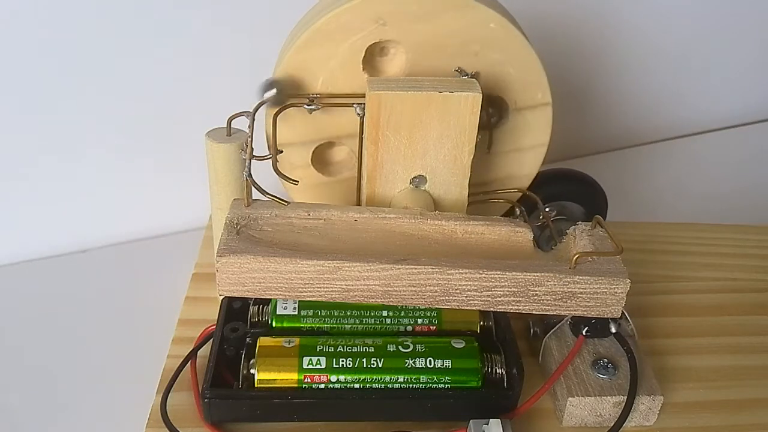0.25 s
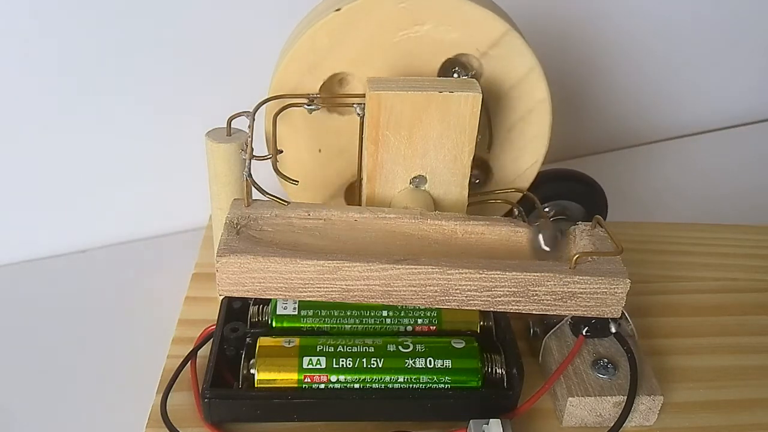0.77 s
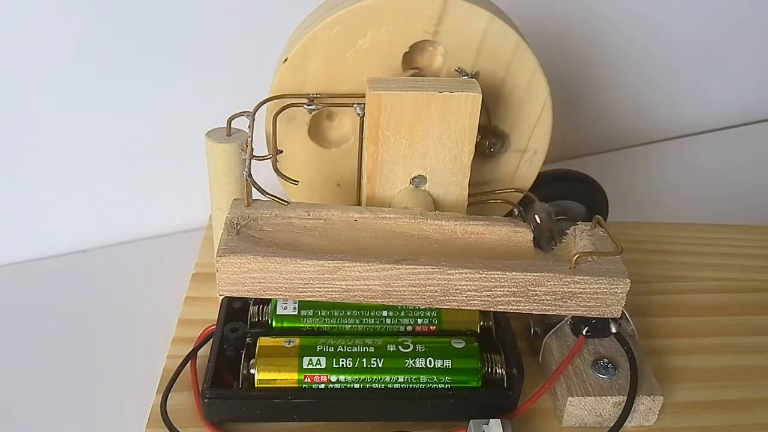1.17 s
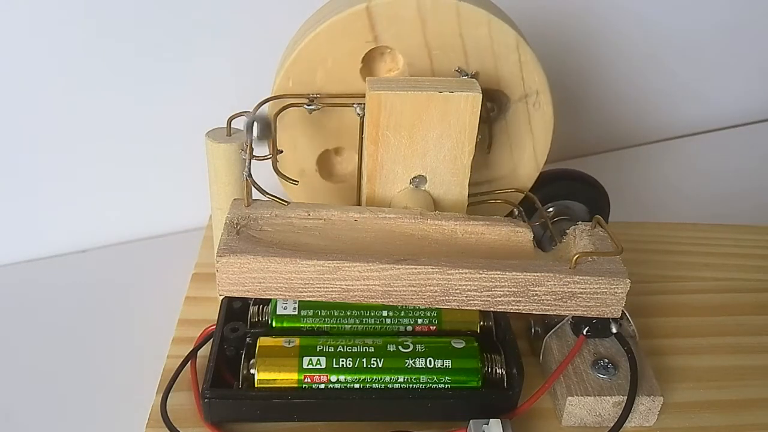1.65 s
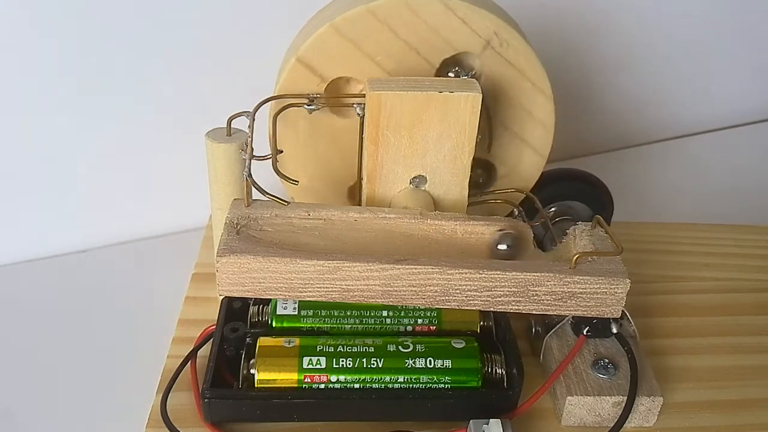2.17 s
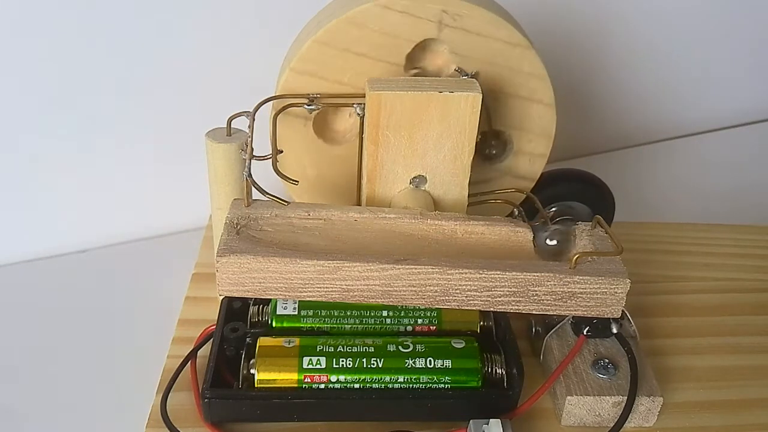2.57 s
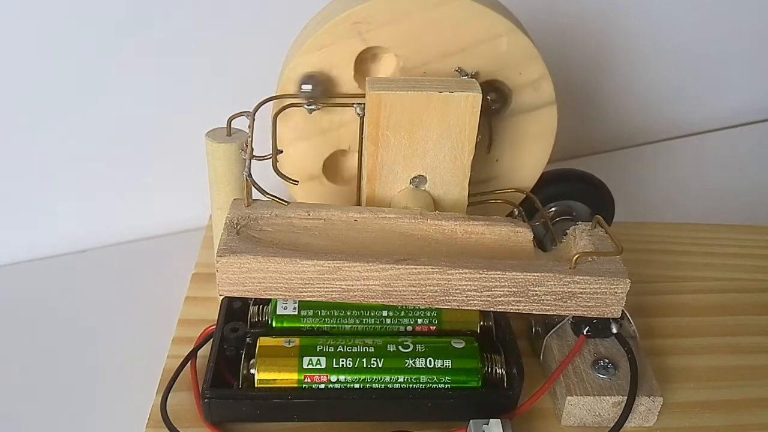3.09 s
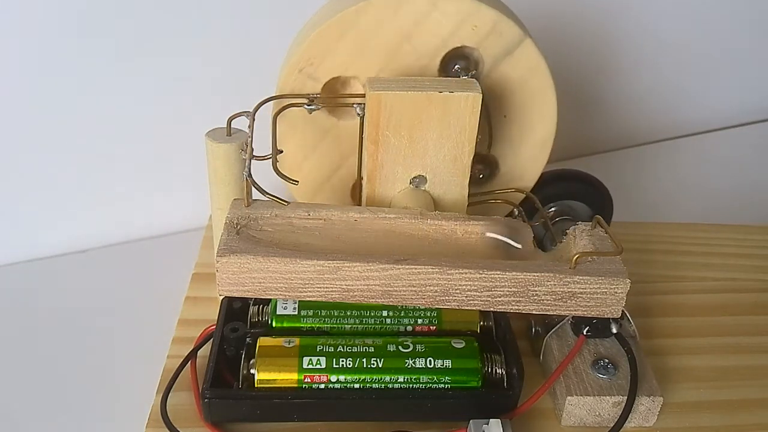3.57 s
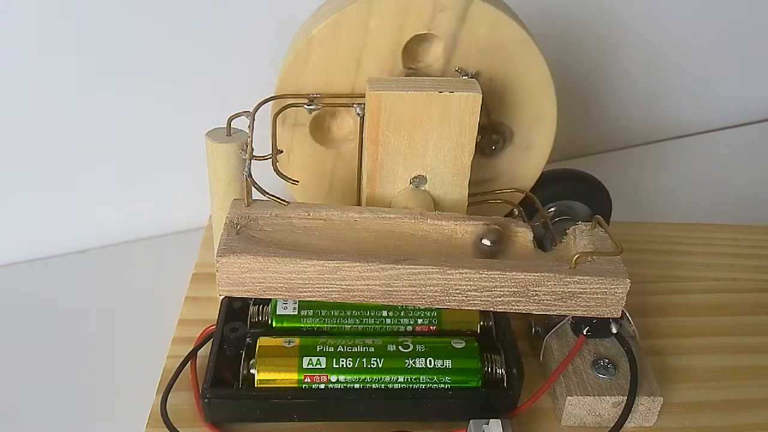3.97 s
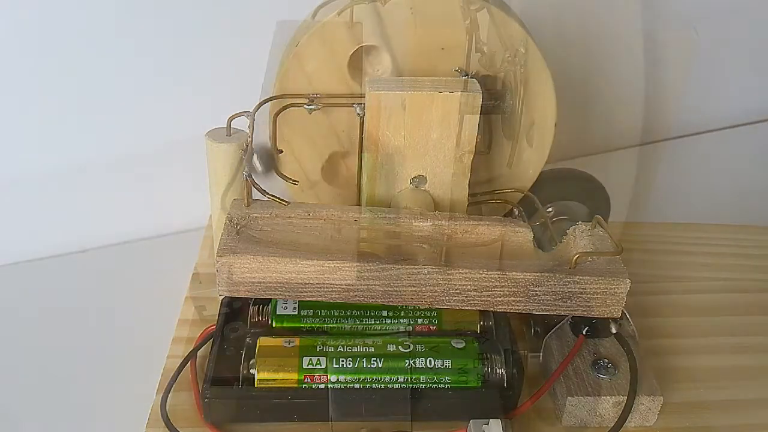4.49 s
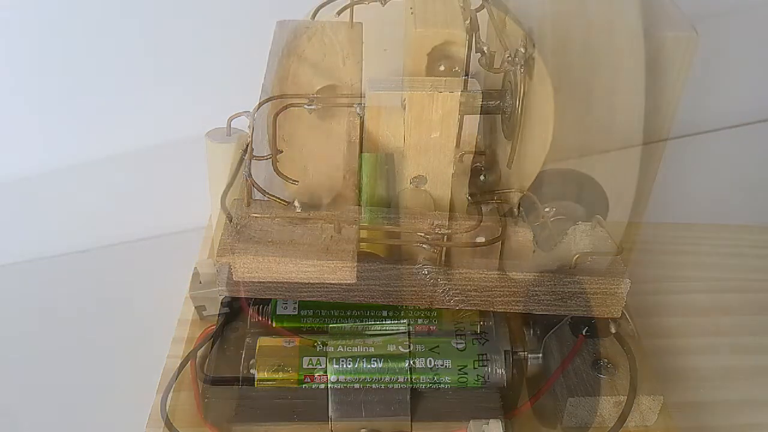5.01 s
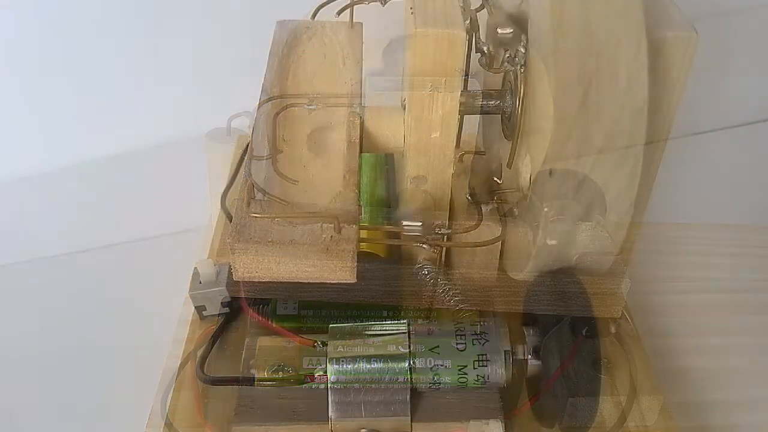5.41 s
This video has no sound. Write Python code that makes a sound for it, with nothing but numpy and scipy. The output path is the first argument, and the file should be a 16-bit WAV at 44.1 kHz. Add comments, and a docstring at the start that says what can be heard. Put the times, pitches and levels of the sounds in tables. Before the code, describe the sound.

Close stereo sound of a small marble machine indoors, leaning left, with a faint short room echo. A thin, bright motor hiss runs throughout, slightly fluttering, above weak low table hum and soft rumble. Marbles tap the wooden wheel and drop onto wire rails at about 0.0, 1.55, 3.05 and 4.6 s. A brief dull wood scuff comes near 0.45 s. Marbles tick and rattle down the wire, then land in the wooden trough with hard knocks near 0.6, 1.9, 3.55 and 4.7 s, followed by small fading bounces and a rustling roll. Steel clacks against steel around 1.25, 2.65, 4.0, the strongest, and 5.3 s; the queue jostles in fast, fading wooden flutters near 1.3, 2.65, 5.3 and 5.5 s. From roughly 4.3 to 4.8 s the hiss crossfades to another, fuller colour, and rolling becomes louder; the hiss keeps rising until the end at 5.6 s.

```python
"""A small wooden marble machine runs close by, a little to the left: a motor hisses, the table hums, the room rumbles.
From the start a wheel tips out steel marbles, which tap and drop onto wire rails; early on something scuffs wood once.
Next, marbles rattle and roll down the rails, land in a wooden trough, bounce, clack into the queue and jostle it.
Near the end the sound crossfades to a second view, with a louder hiss of another colour and louder rolling.
Contacts are pushes and noise bursts rung through resonances; hiss, rolling and rumble are filtered noise; hum is sines."""
import sys
import numpy as np
from scipy import signal
from scipy.fft import rfft, irfft, next_fast_len
from scipy.io import wavfile
from scipy.ndimage import map_coordinates

SR = 44100
rng = np.random.default_rng(int(sys.argv[2]) if len(sys.argv) > 2 else 0)


def dump_mix(stems):
    """Bounce the given channels to the path in sys.argv[1] as a 16-bit WAV at rate SR."""
    frames = np.atleast_2d(stems).T  # one column per channel
    limited = np.clip(frames, -1, 1)  # hard clip at full scale
    pcm = np.round(limited * 32767).astype(np.int16)
    wavfile.write(sys.argv[1], SR, pcm)


N = 249165

# Room rumble: (f/Hz, relative level/dB), and its left-right likeness: (f/Hz, likeness/1)
RUMBLE_COLOUR = [(15, 2), (30, 3.5), (65, -12), (100, -7), (200, -16.5), (320, -12), (550, -37),
                 (1500, -64), (6000, -50), (15000, -46.5)]
RUMBLE_LIKENESS = [(60, .995), (150, .88), (400, .72), (1500, .3), (5000, 0)]
# Decay time of the room: (f/Hz, t60/s)
ROOM_DECAY = [(200, .3), (1000, .28), (4000, .24), (7000, .17), (12000, .12)]
# The drive shaking the table, mean level: (f/Hz, level/dB)
TABLE_HUM = [(33, -60), (55, -63), (146, -74.5), (166, -71)]

# Brush hiss before the common lift in motor(): (t/s, level/dB)
HISS_LEVEL = [(0.0, -42), (0.72, -44), (1.13, -42), (1.49, -43), (4.52, -43), (5.65, -38)]
# Share of the second view in the crossfade: (t/s, share/1)
SECOND_VIEW_SHARE = [(0, 0.24), (4.3, 0), (4.8, 0.94), (5.65, 0.7)]
# Brush hiss in the first and in the second view: (f/Hz, relative level/dB)
FIRST_HISS_COLOUR = [(700, -30.5), (2200, -32.5), (4000, -21), (6300, -20.5), (8200, -19), (8600, -5),
                     (9800, -3), (10450, -4), (10700, -12.5), (11150, -19), (11600, -9), (12200, -10.5),
                     (13200, -26.5), (14200, -13)]
SECOND_HISS_COLOUR = [(700, -26), (2200, -19.5), (4000, -18.5), (6300, -15.5), (7400, -14.5), (7700, -7),
                      (9200, -1.5), (10200, 3.5), (10850, 1), (11200, -1), (11800, -11.5), (12400, -3),
                      (13200, -12), (13900, -16), (14250, -43)]
# Resonances of the motor casing: (f/Hz, width/Hz, lift/dB)
CASING_MODES = [(2880, 220, 6), (4620, 260, 8), (5600, 300, 6), (7520, 80, 4), (8596, 50, 5), (8716, 50, 5),
                (8946, 40, 5), (9250, 70, 4), (10090, 110, 4), (10475, 35, 5), (11521, 60, 4),
                (11887, 55, 5), (12118, 70, 4)]
# Right ear relative to left, for the motor and for the marbles: (f/Hz, level/dB)
MOTOR_EAR_SHADE = [(2500, -1), (3600, -3), (4600, -5), (5400, 2), (6300, -15.5), (6900, -4), (7900, -14),
                   (8700, -8), (10000, -17), (11100, -16), (12000, -10.5), (13100, -31), (13750, 1),
                   (14200, -28)]
MARBLE_EAR_SHADE = [(200, -2), (900, -2.5), (1600, -0.5), (2600, -2.5), (4500, -6), (5700, -6), (7200, -14),
                    (14000, -13)]
SHAFT_HZ = 59  # mean rate of turning

# Rolling marbles and the scuffed base board: (f/Hz, relative level/dB)
ROLL_COLOUR = [(100, 5), (330, -7), (600, -17.5), (870, -6.5), (1100, -3), (1500, 2.5), (2600, 3),
               (4000, 1), (7000, 1), (10000, 3.5), (15000, -38)]
BOARD_COLOUR = [(40, -26), (150, -1.5), (230, -14), (340, 0.5), (450, -3), (650, -8), (880, -2.5),
                (1400, -5), (2600, -8), (4000, -14), (9000, -23)]
# Resonances of the base board: (f/Hz, width/Hz, lift/dB)
BOARD_RESONANCES = [(297, 18, 2.5), (332, 17, 8.5)]

# Broad colour of each struck part: (f/Hz, gain/dB)
TROUGH_COLOUR = [(60, 2), (330, -2), (560, -8.5), (850, 7), (1200, 6), (1800, -3.5), (2500, 2),
                 (3500, -4.5), (4400, -5.5), (6200, -11.5), (7300, -26), (9500, -19), (14000, -28)]
WHEEL_COLOUR = [(80, 3.5), (550, -18.5), (900, 0.5), (1400, 5), (2000, 2), (3200, -3), (4500, -1),
                (6000, -9.5), (7500, -11.5), (10000, -21), (14000, -13)]
STEEL_COLOUR = [(150, -28), (700, -40), (1500, -23.5), (2200, -21.5), (3400, -12), (6000, -15.5),
                (7000, -4.5), (8000, -11), (9800, -5.5), (11200, -9.5), (12200, -11), (14200, -16)]
RAIL_COLOUR = [(150, -17), (700, -15), (1500, -8), (2200, -5), (3000, 3.5), (4200, 2.5), (6000, 4.5),
               (7200, 7.5), (8200, 1.5), (10000, -2.5), (14000, -4)]
# Resonances standing above that colour: (f/Hz, width/Hz, lift/dB)
TROUGH_RESONANCES = [(872, 60, 9), (1270, 120, 3), (1580, 100, 4), (2358, 80, 4), (2536, 55, 7),
                     (2800, 80, 5), (3100, 80, 4), (3366, 50, 10), (4290, 90, 4), (6030, 80, 7)]
WHEEL_RESONANCES = [(1250, 200, 3), (1580, 140, 3), (2400, 200, 2), (4500, 400, 3)]
STEEL_RESONANCES = [(3378, 60, 6), (3891, 55, 10), (4858, 100, 7), (6865, 130, 7), (7200, 150, 12),
                    (8865, 55, 13), (9385, 100, 7)]
RAIL_RESONANCES = [(1540, 80, 6), (2540, 80, 5), (3366, 60, 3), (3895, 70, 7), (4296, 90, 5),
                   (6870, 110, 5), (7200, 110, 6)]

# Contact levels below are those of the blow, before the gain of the struck part.
# A waiting marble bumps softly against the wheel: (t/s, level/dB)
WHEEL_BUMPS = [(0.078, -48.5), (1.354, -52.5), (2.985, -57), (5.432, -54)]
# The wheel tips a marble out, which drops onto the rails: (t/s, tap level/dB, fall/s, drop level/dB)
TIPPINGS = [(0.0221, -36.5, 0.075, -46.5), (1.563, -34.5, 0.067, -40.5), (3.0586, -34.5, .0677, -36),
            (4.6224, -35.5, .065, -38.5)]
# Bends of the wire rails, passed by every marble: (time before landing/s, level/dB)
RAIL_BENDS = [(.453, -43), (.415, -48.5), (.345, -48), (.32, -52), (.205, -51.5), (.1, -45), (.073, -45)]
# Landings in the trough:
# (t/s, level/dB, first flight/s, next flight over last/1, first bounce level/dB, bouncing time/s)
TROUGH_LANDINGS = [(0.6079, -29.5, .147, .88, -42, .32), (1.9105, -24, .147, 0.82, -39, .33),
                   (3.5451, -23, .168, 0.51, -41.5, .29), (4.6913, -26.5, .143, .68, -36.5, .34)]
# Knocks on the trough: wall hits, and faint later knocks of bouncing or other marbles: (t/s, level/dB)
EXTRA_KNOCKS = [(0.755, -29.5), (0.9548, -40), (1.0402, -45.5), (2.1871, -36), (2.2209, -38),
                (4.8498, -31.5), (5.0765, -44), (5.125, -43.5), (5.176, -46.5)]
# Marble against marble in the queue: (t/s, level/dB)
QUEUE_CLACKS = [(1.2281, -35), (1.2455, -27), (1.2666, -29.5), (1.2867, -45), (2.6259, -34), (2.666, -33.5),
                (3.9951, -21), (3.9983, -20.5), (4.0143, -23), (5.282, -27.5), (5.2914, -26),
                (5.306, -27.5), (5.5058, -34)]
# The queue shifts up and jostles against the wood: (t/s, level/dB, fade/(dB/s))
QUEUE_JOSTLES = [(1.2757, -50, 420), (2.6326, -45, 116), (5.284, -49, 300), (5.4995, -47.5, 106)]

# Tones: (bass/dB, treble/dB); the graze follows a tap or an extra knock
TAP_TONE, GRAZE_TONE, DROP_TONE = (-12.5, 7.5), (-15, -5), (0.88, 2)
LANDING_TONE, BOUNCE_TONE = (-13, 0), (-10.5, -16)  # LANDING_TONE holds at HARD_DB
KNOCK_TONE, JOSTLE_TONE = (-19.5, 0.5), (1.9, -4)
# A landing above HARD_DB gains treble and loses bass, one below it the reverse, in dB per dB
HARD_DB, BRIGHTER, THINNER = -26, 1.7, 0.95
GRAZE_S, GRAZE_LOSS_DB = .009, 3.5  # least delay and loss of a marble's second touch on wood
BOUNCE_LOSS_DB = 3.5  # from one bounce to the next
PASS_ON_S, PASS_ON_LOSS_DB = .004, 6  # mean delay and loss of a clack handed to the next marble
CLACK_HARD_DB, CLACK_FULLER = -27, 0.27  # treble stands out less above this level, in dB per dB
JOSTLE_GAP_S, JOSTLE_WIRE_DB = .011, 5.5  # typical gap between bumps; wire rattle re first bump
LEAN_S, LEAN_DB = .025, -44  # scrape on the wire: time before tipping out, level

# Rolling on each stretch, before the second-view gain: (initial level/dB, fade/(dB/s))
ROLL_HEAD, ROLL_RAILS = (-53.5, 69), (-53, 3)
ROLL_TROUGH, ROLL_QUEUE = (-52.5, 28), (-53.5, 12)
# Start and end of a stretch; rolling gain at a full share of the second view
ROLL_RISE_S, ROLL_STOP_DB_PER_S, ROLL_SECOND_VIEW_DB = 0.011, 250, 5.5
SCUFF_S, SCUFF_RISE_S, SCUFF_HOLD_S = 0.436, 0.016, 0.069
SCUFF_DB, SCUFF_STOP_DB_PER_S = -41.5, 330
TOP_HZ = 14280  # middle of the upper band edge


def amp(db):
    """Decibel law: a level in dB becomes an amplitude ratio."""
    return 10 ** (np.asarray(db) / 20)


def unit(x):
    """Normalization: a signal is scaled to unit root-mean-square."""
    return x / np.sqrt(np.mean(x ** 2) + 1e-20)


def along(points, hz):
    """Logarithmic frequency scale: (f/Hz, value) points are joined in log frequency."""
    f, v = np.transpose(points)
    return np.interp(np.log(hz + 1), np.log(f + 1), v)


def curve(rows):
    """Linear interpolation: (t/s, value) rows become one value per sample."""
    return np.interp(np.arange(N) / SR, *np.transpose(rows))


def wobble(rate):
    """Band-limited fluctuation: a smooth curve through random knots, rate of them a second."""
    knots = rng.standard_normal(int(N * rate / SR) + 4)
    return map_coordinates(knots, [np.arange(N) * rate / SR])


def swell(start, rise, hold, db, fade_db, stop_db):
    """Exponential decay: a gain rises, fades by fade_db a second, and by stop_db more after hold."""
    t = np.maximum(np.arange(N) / SR - start, 0)
    level_db = db - fade_db * t - stop_db * np.maximum(t - hold, 0)
    return np.minimum(t / rise, 1) * amp(level_db)


def filtered(x, response):
    """Linear filtering: the spectrum is multiplied by a response of frequency."""
    m = next_fast_len(N + SR // 4)
    hz = np.fft.rfftfreq(m, 1 / SR)
    return irfft(rfft(x, m) * response(hz), m)[..., :N]


def colour(points, modes, hz):
    """Modal resonance: Lorentzian power peaks stand on a broad colour."""
    lift = sum((amp(db) ** 2 - 1) / (1 + (2 * (hz - centre) / width) ** 2)
               for centre, width, db in modes)
    return amp(along(points, hz)) * np.sqrt(np.abs(1 + lift))


def ripple(hz, depth_db, spacing):
    """Modal density: many weak modes, about spacing Hz apart, make the gain uneven."""
    return amp(depth_db * map_coordinates(rng.standard_normal(2048), [hz / spacing]))


def causal(gain):
    """Minimum phase: the response to a gain starts at once and its resonances ring on."""
    cepstrum = irfft(np.log(np.maximum(gain, 1e-6)))
    half = len(cepstrum) // 2
    cepstrum[1:half] *= 2
    cepstrum[half + 1:] = 0
    return np.exp(rfft(cepstrum))


def noise_pair(alike):
    """Interaural coherence: mid and side noises set the likeness of two channels."""
    def mix(hz):
        angle = np.arccos(np.clip(along(alike, hz), -1, 1)) / 2
        return np.array([np.cos(angle), np.sin(angle)])

    mid, side = filtered(rng.standard_normal((2, N)), mix)
    return np.array([mid + side, mid - side])


def from_left(pair, shade, lag_ms):
    """Interaural differences: the right channel is shaded and delayed."""
    def ears(hz):
        delay = np.exp(-2j * np.pi * hz * lag_ms / 1000)
        return np.array([np.ones_like(hz), amp(along(shade, hz)) * delay])

    return filtered(pair, ears)


def room_rumble():
    """Diffuse background: shaped noise is alike in both channels at low frequencies only."""
    air = filtered(noise_pair(RUMBLE_LIKENESS), lambda hz: amp(along(RUMBLE_COLOUR, hz)))
    return amp(-59.0) * unit(air)


def room(x):
    """Reverberation: convolution with decaying noise whose treble dies first."""
    hz, t, z = signal.stft(rng.standard_normal((2, SR // 2)), SR, nperseg=256)
    decay = amp(-60 * t / along(ROOM_DECAY, hz)[:, None])
    tail = signal.istft(z * decay, SR, nperseg=256)[1]
    tail = tail / np.linalg.norm(tail[0])
    tail = np.pad(tail, ((0, 0), (SR // 200, 0)))  # echoes start 5 ms late
    return signal.fftconvolve(x, tail, axes=1)[:, :N]


def table_hum():
    """Forced vibration: the drive shakes the table in sines of wavering level and phase."""
    t = np.arange(N) / SR
    return sum(amp(db + 1.8 * wobble(3.29)) * np.sin(2 * np.pi * hz * t + 0.93 * wobble(9.3))
               for hz, db in TABLE_HUM)


def motor():
    """Modulated friction: brushes rub the commutator harder once a turn; the casing rings with it."""
    turns = np.cumsum(SHAFT_HZ * (1 + .02 * wobble(5))) / SR
    pressure_db = .7 * np.cos(2 * np.pi * turns) + .65 * wobble(130) + .45 * wobble(25)
    rub = amp(pressure_db) * noise_pair([(2000, 0.15), (10000, 0.1)])
    rub = filtered(rub, lambda hz: ripple(hz, 1.1, 45))
    first = unit(filtered(rub, lambda hz: colour(FIRST_HISS_COLOUR, CASING_MODES, hz)))
    second = unit(filtered(rub, lambda hz: colour(SECOND_HISS_COLOUR, CASING_MODES, hz)))
    share = np.clip(curve(SECOND_VIEW_SHARE), 0, 1)
    hiss = amp(curve(HISS_LEVEL) + 7.5) * ((1 - share) * first + share * second)
    return from_left(hiss, MOTOR_EAR_SHADE, lag_ms=.15)


def scuff():
    """Sliding friction: gritty noise excites the base board in one dull scrape."""
    grit = amp(0.78 * wobble(300)) * noise_pair([(300, 0.95), (3000, 0.17)])
    scrape = unit(filtered(grit, lambda hz: colour(BOARD_COLOUR, BOARD_RESONANCES, hz)))
    return swell(SCUFF_S, SCUFF_RISE_S, SCUFF_HOLD_S, SCUFF_DB, 0, SCUFF_STOP_DB_PER_S) * scrape


def rolling_gain():
    """Addition of powers: stretches on rail head, rails, trough (up to the first clack) and queue."""
    run = RAIL_BENDS[0][0]
    stretches = [(s + fall, run, ROLL_HEAD) for s, _, fall, _ in TIPPINGS]
    stretches += [(s, run, ROLL_QUEUE) for s, *_ in QUEUE_JOSTLES]
    for s, *_ in TROUGH_LANDINGS:
        arrival = min(clack for clack, _ in QUEUE_CLACKS if clack > s)
        stretches.append((s - run, run - RAIL_BENDS[-1][0], ROLL_RAILS))
        stretches.append((s, arrival - s, ROLL_TROUGH))
    power = sum(swell(s, ROLL_RISE_S, hold, *level, ROLL_STOP_DB_PER_S) ** 2
                for s, hold, level in stretches)
    return np.sqrt(power) * amp(ROLL_SECOND_VIEW_DB * curve(SECOND_VIEW_SHARE))


def rolling():
    """Roughness excitation: rolling marbles rustle and hop over the grain of the wood."""
    hops = (rng.random(N) < 45 / SR) * rng.standard_normal(N)  # about 45 a second
    rustle = amp(6.7 * wobble(45) + 1.2 * wobble(490)) * noise_pair([(300, 1.0), (3000, 0.72)])
    contact = unit(rustle) + amp(-6.5) * unit(hops)
    roll = filtered(contact, lambda hz: causal(colour(ROLL_COLOUR, TROUGH_RESONANCES[:1], hz)))
    return rolling_gain() * unit(roll)


def spray(t60, spiky, size):
    """Repeated micro-impacts: a dying burst of uneven pushes, of energy 1 in each channel."""
    t = np.arange(size) / SR
    clumps = np.exp(spiky * rng.standard_normal(size))[np.arange(size) // 32]
    burst = rng.standard_normal((2, size)) * clumps * amp(-60 * t / t60)
    return burst / np.linalg.norm(burst, axis=1, keepdims=True)


def strike(rows, body, modes, push_db, chatter_db, chatter_t60, spiky, size=8192):
    """Impulse response: a sharp push and a dying chatter ring through a part's resonances."""
    out, hz = np.zeros((2, N + size)), np.fft.rfftfreq(size, 1 / SR)
    for s, db, *tilt in rows:
        low_db, high_db = tilt or (0, 0)
        hardness = amp(along([(1250, low_db), (2200, 0), (3300, 0), (4400, high_db)], hz))
        spot = ripple(hz, 2.2, 110)  # each spot favours other modes
        # a hard blow is one clean click; a weak one skids, so more of it is chatter
        skid = np.clip((-30 - db) / 12, 0, 1)
        # bending waves carry treble faster than bass, which spreads the push over a millisecond
        dispersion = np.exp(-1j * np.sqrt(hz / rng.uniform(5, 12)))
        push = amp(push_db - 5 * skid) * dispersion
        chatter = amp(chatter_db + 3 * skid) * rfft(spray(chatter_t60, spiky, size))
        resonance = causal(colour(body, modes, hz) * hardness * spot)
        ring = irfft((push + chatter) * resonance)
        start = max(0, round(s * SR))
        out[:, start:start + size] += amp(db) * ring
    return out[:, :N]


def wheel_contacts(count=10):
    """Successive impacts (t/s, level/dB, bass/dB, treble/dB): tap, graze, drop, and queue bumps."""
    rows = [(s, db, *JOSTLE_TONE) for s, db in WHEEL_BUMPS]
    for s, db, fall, drop_db in TIPPINGS:
        rows.append((s, db, *TAP_TONE))
        rows.append((s + GRAZE_S, db - GRAZE_LOSS_DB, *GRAZE_TONE))
        rows.append((s + fall, drop_db, *DROP_TONE))
    for s, db, fade_db in QUEUE_JOSTLES:
        gaps = JOSTLE_GAP_S * np.exp(.15 * rng.standard_normal(count))
        delays = np.cumsum(gaps) - gaps[0]
        rows += [(s + after, db - fade_db * after, *JOSTLE_TONE) for after in delays]
    return rows


def wheel_taps():
    """Short-lived impact: marbles tap wood at the top of the wheel and bump it at its foot."""
    return strike(wheel_contacts(), WHEEL_COLOUR, WHEEL_RESONANCES,
                  push_db=34.5, chatter_db=31.0, chatter_t60=0.031, spiky=0.23)


def rail_contacts():
    """Excitation by scrape, bend and shaken wire: (t/s, level/dB)."""
    scrapes = [(s - LEAN_S, LEAN_DB) for s, *_ in TIPPINGS if s > LEAN_S]
    bends = [(s - before, db) for s, *_ in TROUGH_LANDINGS for before, db in RAIL_BENDS]
    shakes = [(s + JOSTLE_GAP_S / 2, db + JOSTLE_WIRE_DB) for s, db, _ in QUEUE_JOSTLES]
    return scrapes + bends + shakes


def rail_rattles():
    """Prolonged chatter: marbles excite the resonances of the wire rails."""
    return strike(rail_contacts(), RAIL_COLOUR, RAIL_RESONANCES,
                  push_db=26, chatter_db=32, chatter_t60=0.14, spiky=0.32)


def trough_contacts(count=5):
    """Inelastic bouncing (t/s, level/dB, bass/dB, treble/dB): ever shorter flights, and extra knocks."""
    rows = []
    for s, db, flight, shrink, bounce_db, lasts in TROUGH_LANDINGS:
        force = db - HARD_DB
        bass_db = LANDING_TONE[0] - THINNER * force
        treble_db = LANDING_TONE[1] + BRIGHTER * force
        rows.append((s, db, bass_db, treble_db))
        for k, after in enumerate(np.cumsum(flight * shrink ** np.arange(count))):
            if after < lasts:
                level = bounce_db - BOUNCE_LOSS_DB * k
                second_touch = s + after + GRAZE_S * rng.uniform(1, 2)
                rows.append((s + after, level, *BOUNCE_TONE))
                rows.append((second_touch, level - GRAZE_LOSS_DB, *BOUNCE_TONE))
    for s, db in EXTRA_KNOCKS:
        rows.append((s, db, *KNOCK_TONE))
        rows.append((s + GRAZE_S, db - GRAZE_LOSS_DB, *GRAZE_TONE))
    return rows


def trough_knocks():
    """Struck wood: landings, bounces and other knocks ring the modes of the trough."""
    return strike(trough_contacts(), TROUGH_COLOUR, TROUGH_RESONANCES,
                  push_db=33.5, chatter_db=28, chatter_t60=0.059, spiky=0.67)


def queue_contacts():
    """Momentum transfer (t/s, level/dB, bass/dB, treble/dB): each clack has a weaker copy one marble on."""
    rows = []
    for s, db in QUEUE_CLACKS:
        # a harder clack shakes the wood too, so its treble stands out less
        treble_db = CLACK_FULLER * (CLACK_HARD_DB - db)
        delay = PASS_ON_S * rng.uniform(.7, 1.3)
        rows.append((s, db, 0, treble_db))
        rows.append((s + delay, db - PASS_ON_LOSS_DB, 0, treble_db))
    return rows


def queue_clacks():
    """Hard collision: steel meets steel in a bright, brief clack."""
    return strike(queue_contacts(), STEEL_COLOUR, STEEL_RESONANCES,
                  push_db=29, chatter_db=34.5, chatter_t60=0.023, spiky=0.24)


def marbles():
    """Superposition: the marbles' contacts with wheel, rails, trough and each other add up."""
    return wheel_taps() + rail_rattles() + trough_knocks() + queue_clacks()


def scene():
    """Direct-to-reverberant ratio: the machine stands close by, so the room is faint."""
    contacts = from_left(scuff() + rolling() + marbles(), MARBLE_EAR_SHADE, lag_ms=0.16)
    echo = amp(-14.5) * room(contacts)
    return room_rumble() + table_hum() + motor() + contacts + echo


def record(dry):
    """Band limitation: a 100 Hz wide slope about TOP_HZ removes everything above."""
    return filtered(dry, lambda hz: np.clip((TOP_HZ - hz) / 100 + .5, 0, 1))


dry = scene()
out = record(dry)
dump_mix(out)
```